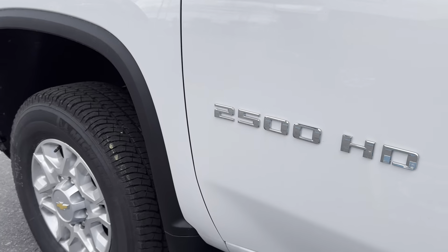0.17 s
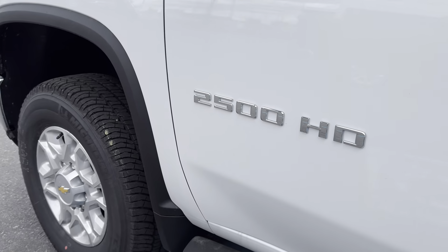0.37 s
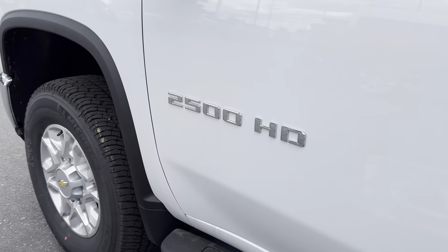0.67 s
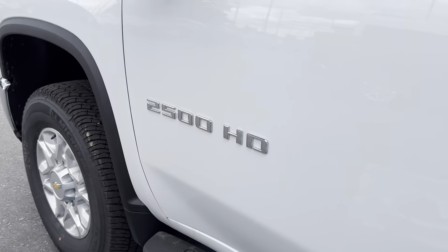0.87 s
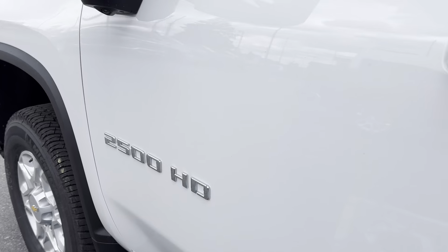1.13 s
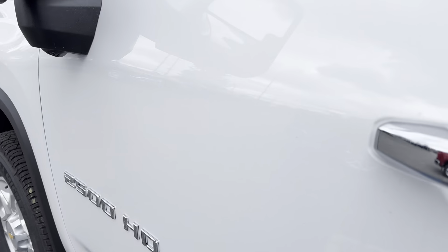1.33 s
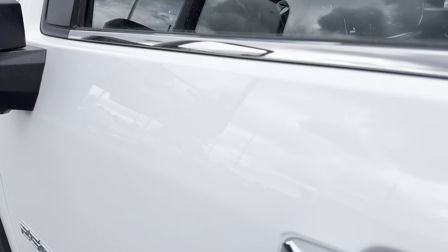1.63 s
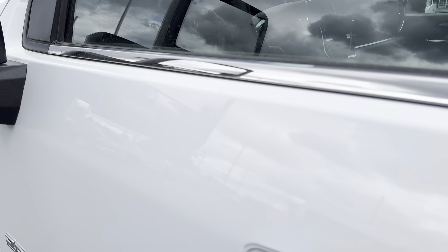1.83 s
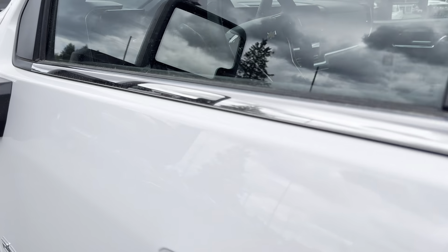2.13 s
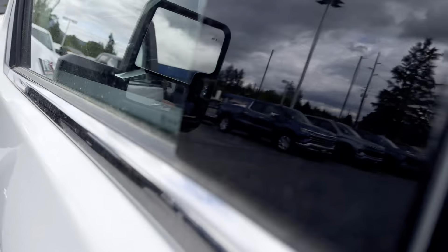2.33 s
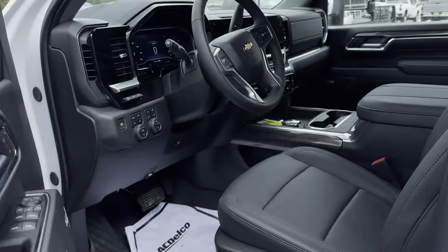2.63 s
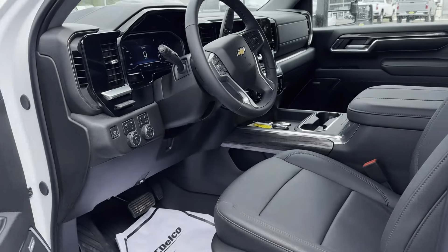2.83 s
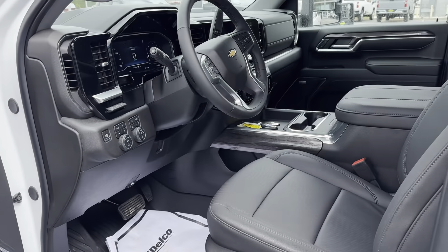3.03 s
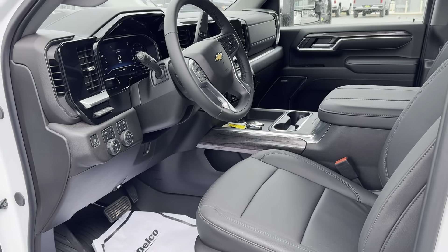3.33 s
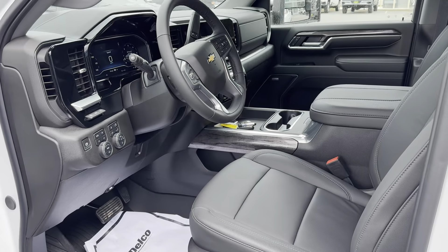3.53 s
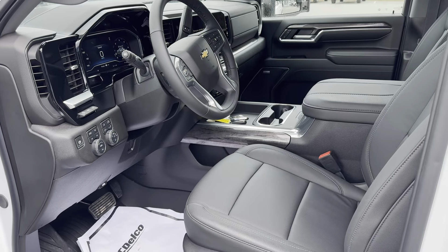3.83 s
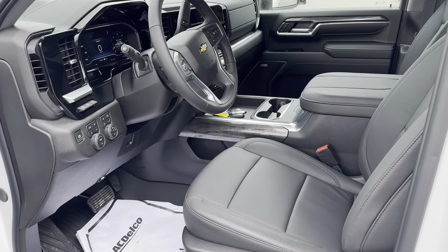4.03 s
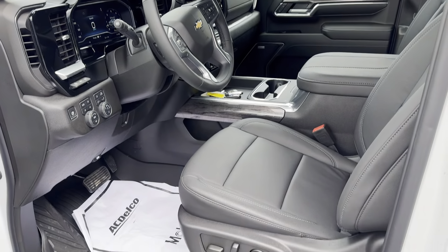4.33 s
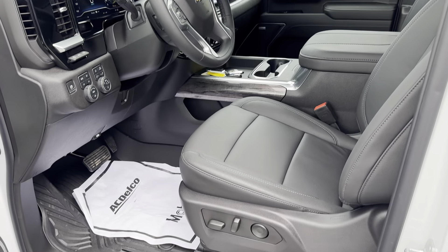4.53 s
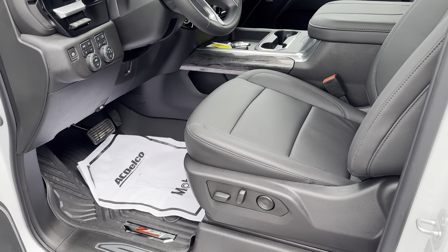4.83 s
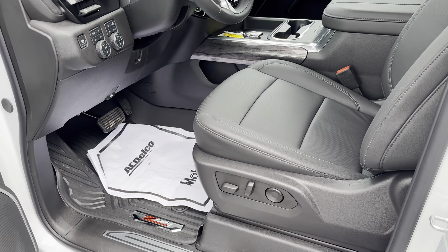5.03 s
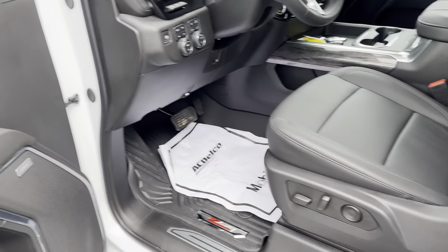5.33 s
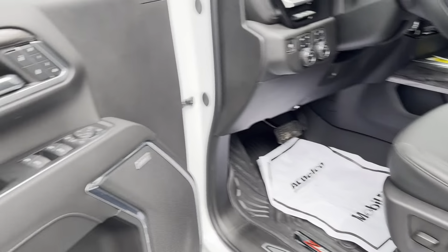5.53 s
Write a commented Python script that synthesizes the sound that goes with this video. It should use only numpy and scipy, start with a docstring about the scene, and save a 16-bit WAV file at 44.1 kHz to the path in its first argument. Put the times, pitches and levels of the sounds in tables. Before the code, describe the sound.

Close diesel idle knocks and hisses steadily while a vehicle door unlatches with two clacks, followed by low wind thumps and a distant drone.

```python
"""Beside a truck a V8 diesel idles: eight uneven firings a cycle knock the block and hiss in the injectors.
A door handle is gripped, the latch snaps free, and wind puffs buffet the microphone as the door swings open.
Far off a propeller drones, its overtones swelling in turn; two faint whines come and go.
Engine and wind are shaped noise and struck resonances, drones are drifting sines, the door is decaying modes."""
import sys
import numpy as np
from scipy import signal
from scipy.fft import rfft, irfft, next_fast_len
from scipy.io import wavfile
from scipy.ndimage import map_coordinates

SR = 44100
rng = np.random.default_rng(int(sys.argv[2]) if len(sys.argv) > 2 else 0)


def int16_out(signal):
    """Quantize to a 16-bit WAV file."""
    q = np.round(np.clip(np.atleast_2d(signal).T, -1, 1) * 32767)
    wavfile.write(sys.argv[1], SR, q.astype(np.int16))


def invert_db(level):
    """Linear amplitude ratio for a level in decibels (20 dB per decade), elementwise."""
    return 10 ** (np.asarray(level, dtype=float) / 20)


N = 251370
TIME = np.arange(N) / SR


def unit(x):
    """Scaled to rms 1."""
    return x / np.sqrt(np.mean(x ** 2) + 1e-20)


def along(points, hz):
    """(Hz, value) points read on a log frequency axis."""
    point_hz, values = np.transpose(points)
    return np.interp(np.log(hz + 1), np.log(point_hz + 1), values)


def curves(rows):
    """One value per sample for each column after the time."""
    at_s, *columns = np.transpose(rows)
    return [np.interp(TIME, at_s, column) for column in columns]


def wobble(rate_hz):
    """A smooth random curve with rate_hz knots a second."""
    knots = rng.standard_normal(int(N * rate_hz / SR) + 4)
    return map_coordinates(knots, [TIME * rate_hz])


def filtered(x, response):
    """x times a complex response of frequency."""
    size = next_fast_len(x.shape[-1] + 8192)
    spectrum = rfft(x, size) * response(np.fft.rfftfreq(size, 1 / SR))
    return irfft(spectrum, size)[..., :x.shape[-1]]


def resonance(hz, width_hz):
    """A steep, causal resonance: two band-passes in series."""
    return lambda f: (1j * f * width_hz / (hz ** 2 - f ** 2 + 1j * f * width_hz)) ** 2


def noise(spectrum, size=N):
    """Two unrelated noises in one colour, joint rms 1."""
    white = rng.standard_normal((2, size))
    return unit(filtered(white, lambda hz: invert_db(along(spectrum, hz))))


def panned(db, pan_db):
    """Gains of the left and right port; pan_db is left minus right."""
    return invert_db([[db + pan_db / 2], [db - pan_db / 2]])


def add_at(out, start_s, sound):
    """Adds a short stereo sound to out in place."""
    start = round(start_s * SR)
    out[:, start:start + sound.shape[1]] += sound


# side signal against mid: pitch_hz, side_re_mid_db
SIDE_LEVEL = [(60, -8.5), (92, -13.5), (140, -4), (210, -6), (330, -7.5), (500, -2.5), (770, -4),
              (1170, -0.5), (1790, -4), (2740, -5), (4190, -5), (6410, -1), (9810, 10.5), (15000, -6)]
# lead of the left port, compressed by tanh before use: pitch_hz, lead_rad
PORT_LEAD = [(0, 0), (430, -0.2), (1030, 0.7), (1980, -0.3), (2500, 0.3), (4130, 0.5), (6030, -0.1),
             (7670, 2.7), (8180, 3.2), (9220, 2.9), (15200, 0.9), (16200, 0.5)]


def stereo(pair, direct):
    """Mid plus and minus a side: partly the mid a quarter wave off, partly the unrelated second signal."""
    def side_response(hz):
        share = np.clip(direct, 0, 1) * np.tanh(3 * along(PORT_LEAD, hz))
        return invert_db(along(SIDE_LEVEL, hz)) * np.array([1j * share, np.sqrt(1 - share ** 2)])
    side = filtered(pair, side_response).sum(0)
    return np.array([pair[0] + side, pair[0] - side])


# walk from front wheel to open door: at_s, rattle_db, hiss_db
WALK = [(0, -43, -49), (.95, -44, -48.5), (1.65, -51, -53), (2.3, -49.5, -54.5), (2.85, -49.5, -51),
        (4, -49, -52), (5.7, -48, -52.5)]


def walk():
    """Rattle level, hiss level, and rattle excess over the level beside the door, all in dB."""
    rattle_db, hiss_db = curves(WALK)
    door_rattle_db = -49
    return rattle_db, hiss_db, rattle_db - door_rattle_db


FIRING_HZ = 40.01  # eight cylinders at 600 rpm
# one cycle, a row per cylinder, relative levels:
# exhaust_puff_db, knock1_db, knock2_db, knock3_db, knock4_db, knock5_db, injector_hiss_db
CYLINDERS = [(0, -14, -10, -8, -3, -10, 2), (-1, -14, 5, 0, 0, -1, 0), (1, 5, -4, 3, 0, 4, 4),
             (0, 0, -1, 1, 1, 3, 1), (-1, -3, -12, -5, 0, -10, -1), (1, -9, -12, -6, -3, -6, 2),
             (0, -4, -12, -6, 1, -6, -5), (0, 3, -12, -8, -2, -12, -5)]


def strokes(column, lag_s, peak_s, scatter_db):
    """A pulse per firing, sized by its cylinder, peaking peak_s after its start and dying away."""
    levels_db = np.transpose(CYLINDERS)[column]
    firings = np.arange(int(N / SR * FIRING_HZ))
    at = np.clip(np.round((firings / FIRING_HZ + lag_s) * SR).astype(int), 0, N - 1)
    kicks = np.zeros(N)
    kicks[at] = invert_db(levels_db[firings % 8] + scatter_db * rng.standard_normal(len(firings)))
    t = TIME[:SR // 10] / peak_s
    return signal.fftconvolve(kicks, t * np.exp(1 - t))[:N]


# exhaust and rumble level: at_s, gain_db
EXHAUST_LEVEL = [(0, -32.5), (.7, -36), (1.5, -30.5), (2.2, -37.5), (3, -42.5), (3.9, -44.5), (4.4, -45),
                 (5, -39.5), (5.7, -33.5)]
# rumble colour: pitch_hz, relative_db_per_hz
RUMBLE = [(15, -54), (25, -22), (53, 6), (83, 6.5), (181, -11), (249, -16), (305, -14.5), (442, -25.5),
          (539, -19.5), (600, -19), (780, -23), (1320, -120)]


def exhaust():
    """Firing pulses excite a low resonance in the centre, over noise rumble."""
    puffs = unit(filtered(strokes(0, lag_s=0, peak_s=.002, scatter_db=2.5), resonance(80, 40)))
    low = invert_db(2.5) * noise(RUMBLE)
    low[0] += invert_db(-4) * puffs
    gain_db = curves(EXHAUST_LEVEL)[0] + 3.1 * wobble(5.99)
    return stereo(invert_db(gain_db) * low, direct=.3)


# clatter colour: pitch_hz, relative_db_per_hz
CLATTER = [(240, -30), (400, -9), (520, -13), (650, -4), (720, -5), (870, -2), (1050, -5), (1350, -10),
           (1600, -11), (1900, -18), (2470, -44), (4180, -120)]


def clatter(closer_db):
    """Mid-band noise that follows the rattle level at reduced slope."""
    door_db, db_per_rattle_db = -45, 0.54
    level_db = door_db + db_per_rattle_db * closer_db + 1.0 * wobble(8)
    return stereo(invert_db(level_db) * noise(CLATTER), direct=0.46)


# knocking engine parts: pitch_hz, width_hz, gain_db, roughness_0_to_1
PARTS = [(720, 46, -47.5, .25), (1190, 75, -53, .3), (1480, 120, -57, .6), (2500, 500, -58, .7),
         (1350, 700, -51, .95)]
# each part's knock behind its firing: lag_s
KNOCK_LAGS = [.005, -.003, .004, -.004, -.006]
# first four knocks, added to the part's gain: at_s, gain_db
KNOCK_LEVEL = [(0, -7), (.6, -3.5), (1, 1.5), (1.4, 0.5), (1.7, -2.5), (4, -2), (5.4, 0), (5.7, -1.5)]


def knocks(closer_db):
    """Each firing strikes five block resonances: a clean blow and a rough after-shake."""
    front_db, db_per_rattle_db = -12, 2.74  # fifth knock: heard near the front wheel
    reach = curves(KNOCK_LEVEL) * 4 + [front_db + db_per_rattle_db * closer_db]
    out = np.zeros((2, N))
    for column, (part, lag_s, reach_db) in enumerate(zip(PARTS, KNOCK_LAGS, reach), start=1):
        hz, width_hz, db, rough = part
        ring = resonance(hz, width_hz)
        blow = unit(filtered(strokes(column, lag_s, peak_s=.0001, scatter_db=1.5), ring))
        envelope = strokes(column, lag_s, peak_s=0.0055, scatter_db=0.7)
        knock = rough * unit(filtered(rng.standard_normal((2, N)) * envelope, ring))
        knock[0] += np.sqrt(1 - rough ** 2) * blow
        out += invert_db(db + reach_db) * knock
    return stereo(out, direct=0.46)


# rattle colour: pitch_hz, relative_db_per_hz
RATTLE = [(940, -17), (1600, 0), (1870, -5.5), (2030, 1), (2420, -3.5), (2670, -1), (2890, -5.5),
          (3370, -7), (3880, -11), (7260, -15.5), (7960, -20.5), (8600, -61), (11200, -66), (18900, -120)]
# narrow bands in the rattle, level beside the door: pitch_hz, width_hz, level_db
RATTLE_BANDS = [(857.7, 34, -58.5), (1274, 18, -62.5), (1980, 50, -69), (3387, 18, -67), (4060, 160, -70.5),
                (5460, 37, -70), (6300, 25, -78)]


def rattle(rattle_db, closer_db, beat):
    """Broad noise lightly pulsed by injection, plus narrow noise bands."""
    pulsed = unit((1 + 0.2 * beat) * noise(RATTLE))
    out = invert_db(rattle_db + 0.49 * wobble(10)) * pulsed
    for hz, width_hz, db in RATTLE_BANDS:
        band = unit(filtered(rng.standard_normal((2, N)), resonance(hz, width_hz)))
        out += invert_db(db + closer_db) * band
    return out


# injector hiss colour: pitch_hz, relative_db_per_hz
HISS = [(4710, -33), (8000, -9.5), (8610, -32), (9080, -11.5), (9610, -7.5), (12900, -7.5), (14000, 4),
        (15100, 4), (15700, -1)]


def injectors(hiss_db, beat):
    """Spray noise: a steady hiss with a pulse for each firing."""
    hiss = unit((.85 + beat) * noise(HISS))
    return invert_db(hiss_db + 0.92 * wobble(7.3)) * hiss


def engine():
    """Exhaust, block knocks, clatter, rattle and injector hiss on one firing clock."""
    rattle_db, hiss_db, closer_db = walk()
    beat = strokes(6, lag_s=-.008, peak_s=.005, scatter_db=1.5)  # injection leads firing
    high = rattle(rattle_db, closer_db, beat) + injectors(hiss_db, beat)
    top_hz = 15850
    high = filtered(high, lambda hz: hz < top_hz)
    return exhaust() + clatter(closer_db) + knocks(closer_db) + stereo(high, direct=.7)


def tone(hz, rms_db, drift_rad):
    """A sine whose phase drifts slowly."""
    phase = 2 * np.pi * np.cumsum(hz) / SR + drift_rad * wobble(7.3) + rng.uniform(0, 2 * np.pi)
    return np.sqrt(2) * invert_db(rms_db) * np.sin(phase)


def far_tone(mono):
    """Stereo image of a tone: nearly all direct."""
    return stereo(np.array([mono, np.zeros(N)]), direct=0.96)


# propeller levels: at_s, blade_tone_db, second_overtone_db, upper_overtones_db
PROPELLER = [(0, -31.5, -51, -49.5), (.4, -34, -38, -53), (1.4, -36, -53, -45), (1.7, -31.5, -55, -52.5),
             (2.3, -31.5, -51, -48), (3.2, -41, -45, -51), (4.25, -54, -56.5, -56),
             (4.5, -34.5, -58, -56.5), (4.9, -29, -41, -51), (5.15, -29.5, -42, -47),
             (5.4, -31, -46.5, -44.5), (5.7, -36, -42, -49.5)]
# upper overtones: multiple_of_blade_rate, level_re_upper_db
UPPER_OVERTONES = [(3, 0), (4, -5.5), (5, -9.5), (6, -12)]
# shaft orders between the three blades: order, level_re_blade_tone_db
SHAFT_ORDERS = [(2, -8), (4, -13.5), (5, -18.5)]


def propeller():
    """Multiples of a sagging blade rate, plus orders of the shaft at a third of it."""
    steady_hz, excess_hz, settle_s = 98.35, 3.1, .75
    blade_hz = steady_hz + excess_hz * np.exp(-(TIME / settle_s) ** 1.5)
    first_db, second_db, upper_db = curves(PROPELLER)
    out = tone(blade_hz, first_db + 1.3 * wobble(7), drift_rad=0.14)
    out += tone(2 * blade_hz, second_db + 1.2 * wobble(15), drift_rad=0.12)
    for multiple, db in UPPER_OVERTONES:
        out += tone(multiple * blade_hz, upper_db + db + 2.2 * wobble(2.5), drift_rad=0.088)
    for order, db in SHAFT_ORDERS:
        out += tone(order * blade_hz / 3, first_db + db + 2.5 * wobble(5), drift_rad=.5)
    return far_tone(out)


# whine levels: at_s, lower_db, upper_db
WHINE_LEVELS = [(0, -73, -79), (3.3, -73, -63), (4, -68, -72), (4.5, -56.5, -60), (4.95, -60, -59),
                (5.4, -69, -57), (5.7, -67, -68)]
# whine centre pitches, lower then upper: pitch_hz
WHINE_PITCHES = [2314, 2615]


def whines():
    """Two faint sines of wandering pitch and level, clearest at the open door."""
    out = np.zeros(N)
    for hz, db in zip(WHINE_PITCHES, curves(WHINE_LEVELS)):
        out += tone(hz + 6 * wobble(3), db + 1.5 * wobble(8), drift_rad=.4)
    return far_tone(out)


# slow swell: at_s, level_db
SWELL_LEVEL = [(0, -31.5), (.7, -31), (1.2, -44), (1.4, -28), (1.55, -46), (1.9, -28), (2.25, -37.5),
               (2.5, -22.5), (2.75, -16), (3, -35.5), (3.5, -35.5), (4.15, -48.5), (5, -40), (5.7, -40)]
# swell colour: pitch_hz, relative_db_per_hz
SWELL = [(15, -36), (25, -8), (38, 1), (65, 12), (110, 3.5), (160, -15), (250, -120)]
# quicker flutter: at_s, level_db
FLUTTER_LEVEL = [(0, -41), (1.1, -41.5), (1.55, -42.5), (2.1, -33.5), (2.4, -31), (2.5, -20.5), (2.63, -26),
                 (2.73, -24.5), (2.82, -27), (2.97, -25.5), (3.1, -39), (3.6, -43), (4.15, -43), (5, -42),
                 (5.7, -50)]
# flutter colour: pitch_hz, relative_db_per_hz
FLUTTER = [(65, -28), (110, 1.5), (216, -5.5), (318, -11.5), (386, -12.5), (529, -19.5), (863, -48),
           (1000, -53), (1300, -90), (2200, -120)]


def buffeting():
    """Wind at the microphone: lumpy low noise, a slow swell under a quicker flutter."""
    swell = invert_db(curves(SWELL_LEVEL)[0]) * unit(invert_db(1.5 * wobble(5)) * noise(SWELL))
    flutter = invert_db(curves(FLUTTER_LEVEL)[0]) * unit(invert_db(3.4 * wobble(16)) * noise(FLUTTER))
    return stereo(swell + flutter, direct=0.045)


def hump(t, peak_s):
    """A smooth pulse that reaches 1 at peak_s."""
    return (t / peak_s) ** 2 * np.exp(2 - 2 * t / peak_s)


# single puffs; bright drives the three upper flaps, scaled and offset:
# start_s, second_flap_db, bass_re_second_db, bright_drive_db
PUFFS = [(0.064, -30, 8, -19), (0.237, -30.5, 19, -26), (0.498, -25, 4, -31), (0.778, -27, -6, -23),
         (1.414, -28.5, -13, -22), (1.459, -30, -4, -17), (2.318, -20, -19, -31), (2.459, -16.5, 2, -16),
         (2.515, -24, 14, -9.5), (2.539, -15.5, 8.5, -17), (2.583, -9, -5, -25), (2.608, -11.5, -10, -27),
         (2.664, -16.5, 1, -21), (2.688, -22.5, 4.5, -15), (2.736, -15.5, -15, -7),
         (2.778, -20.5, 7.5, -32), (2.85, -9.5, -7.5, -18.5), (2.87, -11.5, 4, -22),
         (2.917, -8.5, -3, -27.5), (2.934, -11, -0.5, -11.5), (2.959, -16.5, -13, -10.5),
         (3.099, -25, -12, -15.5), (3.143, -22.5, -2, -11), (3.17, -28, -4, -6.5), (3.245, -29, 1, -13.5),
         (3.337, -28.5, 7, -21), (3.472, -26, 1, -14), (3.703, -26, -17, -20), (3.849, -35, -3, -9),
         (3.886, -30, 2, -15), (4.17, -35, -19, -12), (4.988, -23, 5, -24), (5.065, -32, 2, -18)]


def puffs():
    """Each puff pushes the membrane: a slow bass swing under quicker, shorter flaps."""
    out, t = np.zeros((2, N + SR)), TIME[:SR // 8]
    flap_hz = np.array([84.6, 168.6, 276.3, 406, 553])
    bass_peak_s, pan_spread_db = 0.014, 2
    for start_s, db, deep_db, bright_db in PUFFS:
        hz = flap_hz * np.exp(.07 * rng.standard_normal(5))
        # ports differ a little in phase
        phase = rng.uniform(0, 2 * np.pi, 5) + .45 * rng.standard_normal((2, 5))
        wave = np.sin(2 * np.pi * hz[:, None] * t + phase[:, :, None])
        shape = [invert_db(deep_db) * hump(t, bass_peak_s),
                 hump(t, .5 * bass_peak_s),
                 invert_db(bright_db / 2 + 6.0) * hump(t, 0.31 * bass_peak_s),
                 invert_db(bright_db + 9.0) * hump(t, 0.28 * bass_peak_s),
                 invert_db(bright_db - 1.0) * hump(t, 0.22 * bass_peak_s)]
        gains = panned(db, rng.normal(0, pan_spread_db))
        add_at(out, start_s, gains * (wave * shape).sum(1))
    return out[:, :N]


def rings(modes, t, attack_s):
    """Decaying modes, level and phase scattered per blow and port, behind a soft attack."""
    total = np.zeros((2, len(t)))
    for hz, db, t60_s in modes:
        decay = invert_db(db + rng.normal(0, 1.5, (2, 1)) - 60 * t / t60_s)
        total += decay * np.sin(2 * np.pi * hz * t + rng.normal(0, .35, (2, 1)))
    return total * (1 - np.exp(-t / attack_s))


# pushes on the door skin: start_s, gain_db, pan_db
THUDS = [(1.915, -15.5, -11), (1.92, -11, 0), (1.9327, -21, -2), (1.939, -13.5, -3), (2.426, -8, -1),
         (2.4354, -8.5, 8), (2.4392, -21, 6)]
# door skin modes: pitch_hz, mean_level_db, t60_s
PANEL_MODES = [(151, 1, 0.059), (254, 1.5, 0.058), (328, -2.5, 0.054), (434, -3.5, 0.048),
               (531, -5.5, 0.062), (617, -3.5, 0.037)]


def door_skin():
    """Pushes boom in the large panel; soft contact."""
    out, t = np.zeros((2, N)), TIME[:SR // 8]
    for start_s, db, pan_db in THUDS:
        add_at(out, start_s, panned(db, pan_db) * rings(PANEL_MODES, t, attack_s=.004))
    return out


# blows on the latch parts: start_s, gain_db, pan_db
CLACKS = [(1.9317, -13.5, -6.5), (1.939, -30.5, -2), (2.4332, -25, 10), (2.4354, -21, 9), (2.4392, -20, 13)]
# latch part modes: pitch_hz, mean_level_db, t60_s
LATCH_MODES = [(645, 16.5, 0.0086), (856, -5.5, 0.027), (940, -2, 0.013), (1160, -1.5, 0.033),
               (1440, -37, 0.026), (2620, -16, 0.035), (3470, -22, 0.035), (4600, -26, 0.038),
               (6400, -12, 0.0098), (7380, -17, 0.015)]


def latch_parts():
    """Blows ring the small latch parts; hard contact."""
    out, t = np.zeros((2, N)), TIME[:SR // 8]
    for start_s, db, pan_db in CLACKS:
        add_at(out, start_s, panned(db, pan_db) * rings(LATCH_MODES, t, attack_s=0.00032))
    return out


# sharp contacts: start_s, gain_db, fizz_re_crack_db, pan_db
SNAPS = [(1.9318, -28.5, -3, -1), (2.419, -31, 9.5, -2), (2.432, -31, -7.5, 3), (2.4335, -13, -9.5, 2.5),
         (2.44, -24, -30, -2)]
# crack colour: pitch_hz, relative_db
CRACK = [(900, -120), (1500, 4.5), (2500, 3.5), (4000, 1.5), (6000, -1.5), (7600, -8), (8600, -42),
         (9500, -120)]
# fizz colour: pitch_hz, relative_db
FIZZ = [(7000, -120), (8500, -13), (11000, -2.5), (13500, -3.5), (15800, -17)]


def latch_snaps():
    """Sharp contacts crack as noise bursts; the crack rattles on briefly inside the door."""
    out, t = np.zeros((2, N)), TIME[:SR // 8]
    snap = invert_db(-60 * t / 0.0078) * (1 - np.exp(-t / 0.00028))
    tail = invert_db(-13.5 - 60 * t / 0.069)
    for start_s, db, fizz_db, pan_db in SNAPS:
        crack = (snap + tail) * noise(CRACK, size=len(t))
        fizz = snap * invert_db(fizz_db) * noise(FIZZ, size=len(t))
        add_at(out, start_s, panned(db, pan_db) * stereo(crack + fizz, direct=1.0))
    return out


def scene():
    """Everything that reaches the two microphone ports."""
    drones = propeller() + whines()
    wind = buffeting() + puffs()
    door = door_skin() + latch_parts() + latch_snaps()
    return engine() + drones + wind + door


def low_pass(x):
    """Removes everything above the highest recorded frequency."""
    return signal.sosfilt(signal.butter(12, 16660, fs=SR, output="sos"), x)


# port colour: pitch_hz, left_minus_right_db
PORT_COLOUR = [(60, 1), (130, -1.5), (290, 0), (640, 1), (1410, -0.5), (3100, 2), (6820, 3), (15000, -0.5)]


def record(dry):
    """The two ports differ in colour; loud peaks round off."""
    halves = np.array([[.5], [-.5]])
    heard = filtered(dry, lambda hz: invert_db(halves * along(PORT_COLOUR, hz)))
    ceiling = .93
    rounded = heard / (1 + np.abs(heard / ceiling) ** 6) ** (1 / 6)
    return low_pass(rounded)


dry = scene()
out = record(dry)
int16_out(out)
```